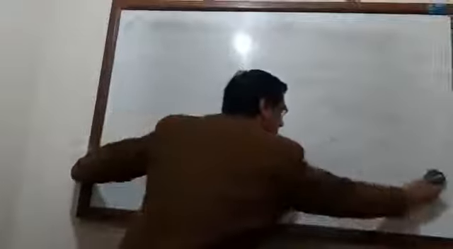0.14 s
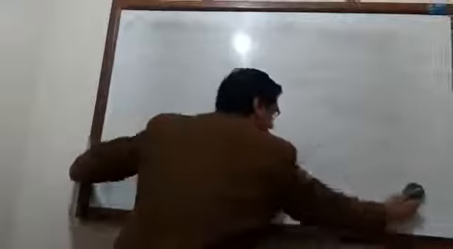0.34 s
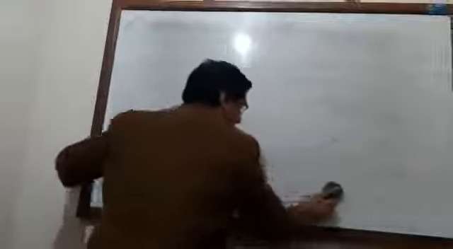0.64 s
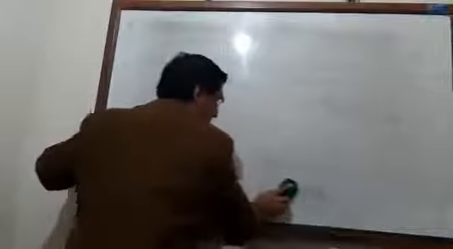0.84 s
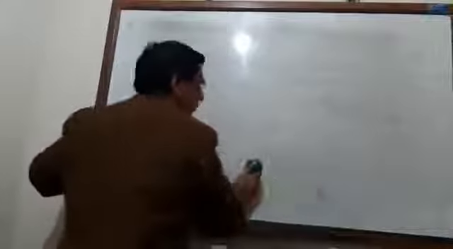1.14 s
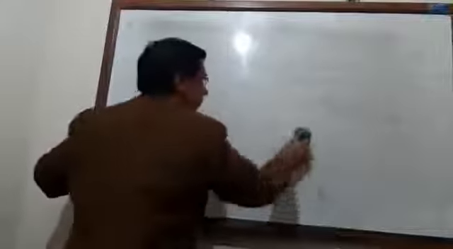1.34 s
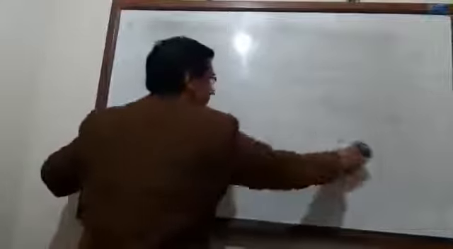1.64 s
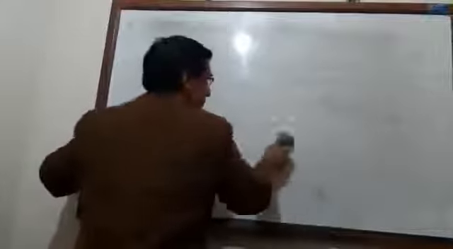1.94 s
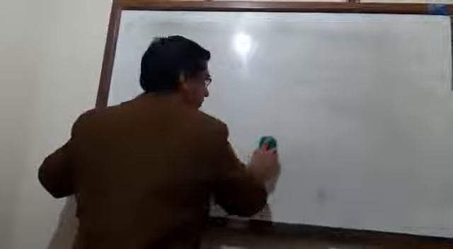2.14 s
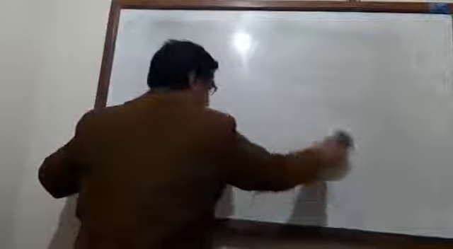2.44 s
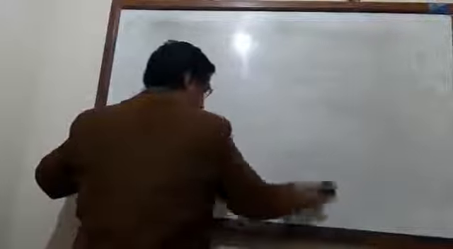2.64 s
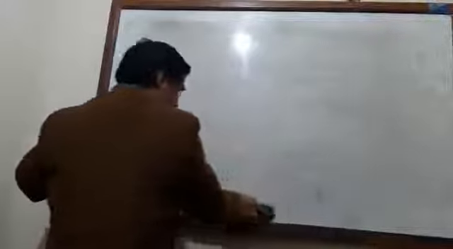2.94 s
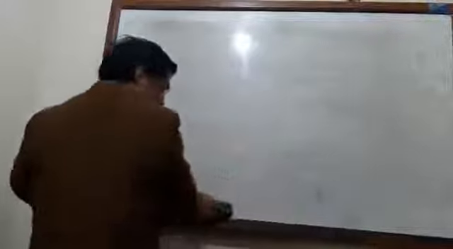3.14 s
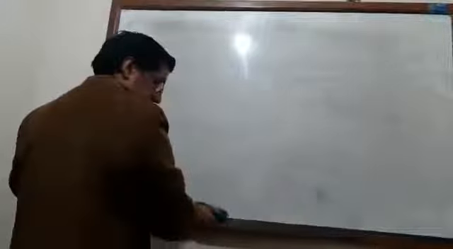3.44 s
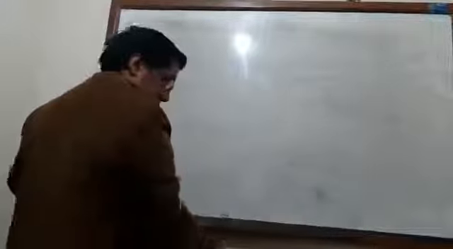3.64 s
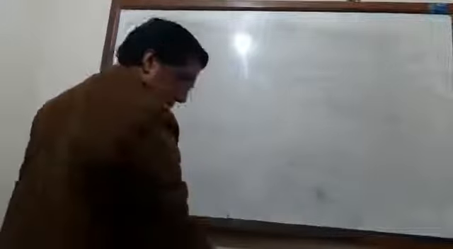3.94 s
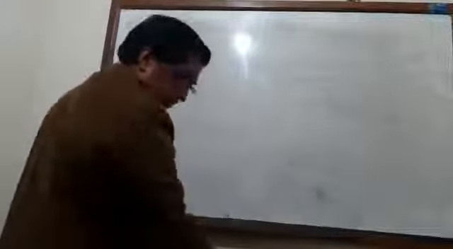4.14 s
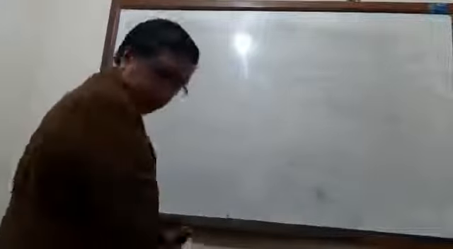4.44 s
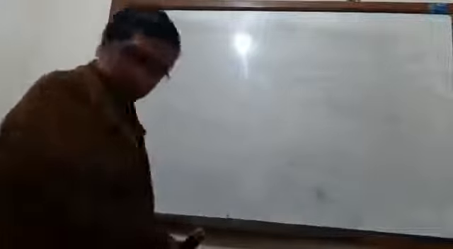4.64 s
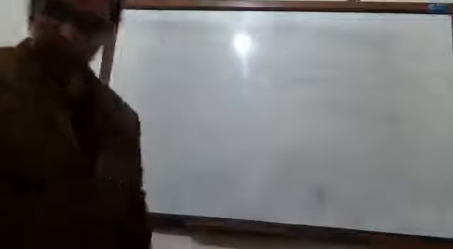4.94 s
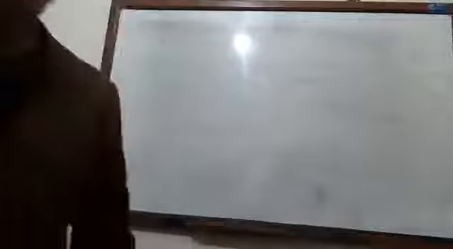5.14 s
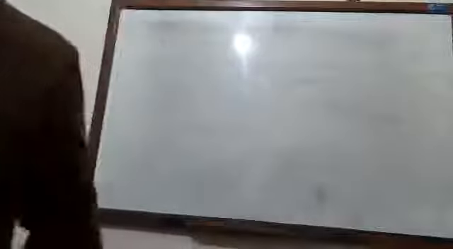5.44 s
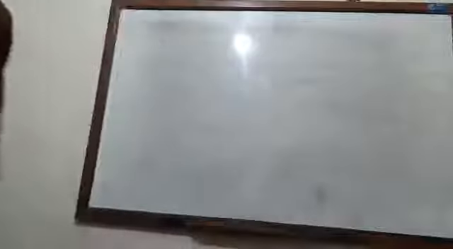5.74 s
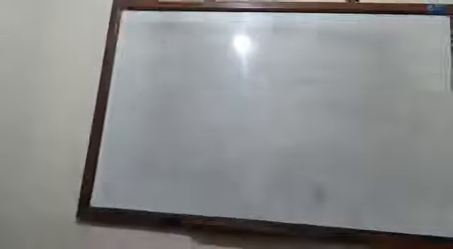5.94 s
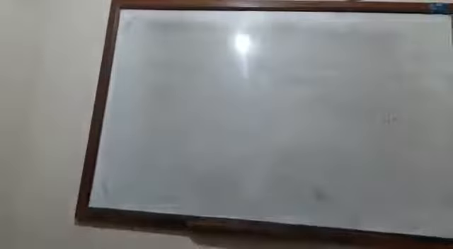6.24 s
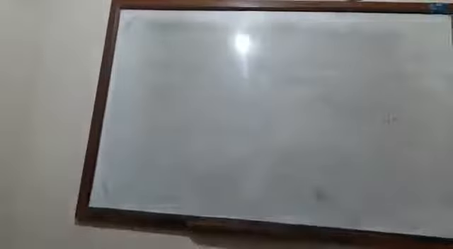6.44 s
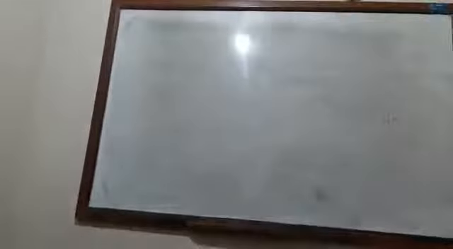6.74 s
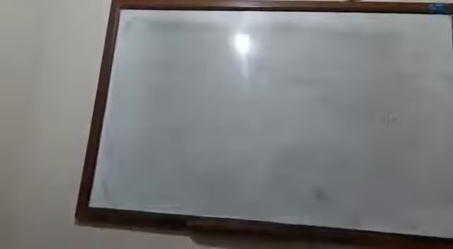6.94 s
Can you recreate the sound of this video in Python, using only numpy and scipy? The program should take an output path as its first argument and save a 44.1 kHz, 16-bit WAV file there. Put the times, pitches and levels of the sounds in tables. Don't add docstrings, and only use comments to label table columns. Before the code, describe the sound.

A dry felt eraser rubs a wall-mounted whiteboard in soft, hissing strokes, a few of them harder, with faint squeaks and panel drumming. It scrapes the ledge, then three plastic knocks ring through a small bare room, the last heaviest and boomy. Rubber soles and cloth shuffle off with little creaks and dull heel thumps. Captured by a phone a few metres away, over faint hiss and a low distant hum.

```python
import sys
import numpy as np
from scipy import signal
from scipy.fft import rfft, irfft
from scipy.io import wavfile
from scipy.ndimage import uniform_filter1d

SR = 44100
rng = np.random.default_rng(int(sys.argv[2]) if len(sys.argv) > 2 else 0)


def unload_audio(sound):
    columns = np.transpose(np.atleast_2d(sound))
    steps = np.round(np.clip(columns, -1, 1) * 32767)
    wavfile.write(sys.argv[1], SR, steps.astype(np.int16))


def gain_from_db(level_db):
    decades = np.asarray(level_db, float) / 20
    return 10 ** decades


N = 312430
T = np.arange(N) / SR
HZ = np.fft.rfftfreq(N, 1 / SR) + 1e-3


def read(table, hz):
    f, v = np.transpose(table)
    return np.interp(np.log(hz), np.log(f), v)


def unit(x):
    return x / np.sqrt(np.mean(x ** 2))


def shape(x, gain):
    return irfft(rfft(x) * gain, N)


def rings(table):
    return gain_from_db(sum(db / (1 + (2 * (HZ - f) / width) ** 2) for f, width, db in table))


def between(lo_hz, hi_hz):
    return 1 / np.sqrt((1 + (lo_hz / HZ) ** 8) * (1 + (HZ / hi_hz) ** 8))


def walk(rate):
    k = int(SR / rate)
    steps = np.repeat(rng.standard_normal(N // k + 1), k)
    return unit(uniform_filter1d(uniform_filter1d(steps, k), k)[:N])


def patchy(x, spread_db, hole_db, size, count):
    hz, _, z = signal.stft(x, SR, nperseg=1536)
    field = uniform_filter1d(rng.standard_normal(z.shape[1:]), size=size, axis=0)
    field = unit(uniform_filter1d(field, size=count, axis=1))
    edge = np.interp(hz, [1800, 2900, 7700, 8450, 9300, 10500], [-3, -1.9, -1.6, -1, -1.6, -2.3])[:, None]
    loud = np.mean(np.abs(z) ** 2, axis=(0, 1))
    quiet = loud < np.quantile(loud, .19)
    edge = edge + 1.6 * np.outer(np.exp(-((hz - 8300) / 450) ** 2), quiet)
    z = z * gain_from_db(spread_db * field - hole_db * (field < edge))
    return signal.istft(z, nperseg=1536)[1][:, :N]


# pitch_hz, level_db
PORT_DIFFERENCE = [(60, -10), (110, -9), (200, -9), (380, -7), (700, -3), (1290, 1), (2380, 0), (4400, 0),
                   (8120, 0), (15000, 0)]


def diffuse(grain_db, rate, clump_db=3.0):
    grains = rng.standard_normal((2, N)) * gain_from_db(grain_db * walk(rate))
    mid, side = patchy(grains, spread_db=clump_db, hole_db=0, size=2, count=6)
    side = shape(side, gain_from_db(read(PORT_DIFFERENCE, HZ)))
    return np.array([mid + side, mid - side])


def swells(s, held, rise, db, t60):
    t = T[::32, None]
    climb_db = 20 * np.clip(s - t, 0, None) / np.clip(rise, .002, None)
    decay_db = 60 * np.clip(t - s - held, 0, None) / t60
    power = gain_from_db(2 * (db - climb_db - decay_db))
    return np.interp(T, t[:, 0], power.sum(axis=1))


def touches(table, body_db, drum_db, t60s):
    s, held, rise, db, fizz_db = np.transpose(table)
    layers = zip((0, fizz_db, body_db, drum_db), t60s)
    return np.array([swells(s, held, rise, db + more, t60) for more, t60 in layers])


# start_s, hiss_db, lean_db (how much body and panel join in)
PRESSURE = [(0.0, -52, 1), (0.12, -55, 5), (0.28, -60.5, 0), (0.45, -57.5, -1), (0.65, -56.5, -1),
            (1.0, -54.5, -5), (1.3, -57, 7.5), (1.6, -57.5, -2), (2.15, -61, 0.5), (2.4, -57, 8),
            (2.6, -58.5, -5), (2.84, -62.5, 3), (2.88, -63.5, -11), (3.4, -65, -11), (3.48, -74, 6),
            (3.601, -100, 0.5)]
# full_at_s, held_s, rise_s (per 20 dB), hiss_db, fizz_db (against hiss)
SCRAPES = [(0.33, 0.11, 0.05, -64, 7), (0.78, 0.088, 0.1, -57, -16.5), (1.063, 0, .03, -54, 0),
           (1.08, 0.055, 0.08, -47.5, 0), (1.18, 0.011, 0.0644, -43.5, 0), (1.96, 0.14, 0.7, -58.5, -4.5),
           (2.156, .01, .015, -55, -12), (2.17, 0.023, 0.03, -47, -10.5), (2.73, 0.028, 0.26, -50, -2.5),
           (3.1, 0.092, -0.1, -62, -6), (3.39, 0.0, 2.5, -65, 2.5), (3.497, .004, 0, -60, -3),
           (3.504, 0.035, 0, -55, 0), (3.521, 0.03, .012, -49.5, 0.5), (3.536, .02, .02, -46, -2),
           (3.559, 0.016, 0.03, -42.5, -2.5), (3.96, .03, 0.1, -64.5, 0.5), (4.0, 0.0, 0.04, -60, 1),
           (4.009, 0.0077, -0.0146, -44, -11), (4.125, .01, -0.01, -52, -6),
           (4.038, 0.0027, -0.01, -47, -12), (4.138, 0.0, -0.07, -45, -16), (4.18, .04, .1, -56, 8),
           (4.11, 0.12, 0.13, -57, 5.5), (4.44, 0.0085, 0, -61, -7), (4.463, 0.022, 0.02, -47.5, 1.5)]
# full_at_s, held_s, rise_s (per 20 dB), hiss_db, fizz_db (against hiss)
SHUFFLES = [(4.74, 0.025, .1, -68.5, -2.5), (4.896, 0.12, 0.032, -60.5, -5.5),
            (5.036, 0.037, 0.02, -59, 0.5), (5.13, 0.019, 0.014, -63, 0), (5.174, 0.0, 0.1, -54.5, -3.5),
            (5.448, 0.11, 0.57, -70.5, -3.5), (5.535, 0.025, 0.028, -72, 3), (5.645, .02, .015, -70, 6),
            (5.694, 0.059, 0.046, -53, 0.5), (5.82, 0.046, .05, -62.5, -4), (5.902, 0.044, 0.012, -61, -2),
            (6.03, 0.022, 0.056, -72, -8), (6.18, .03, .02, -76, -5), (6.224, .01, .01, -70, 4),
            (6.25, 0.021, 0.036, -61, 6.5), (6.304, 0.069, 0.082, -53, -2),
            (6.426, 0.046, 0.068, -46.5, -4.5), (6.56, .04, .05, -68, -14), (6.64, 0.017, .015, -64, -9),
            (6.65, 0.071, 0.003, -54, -3.5), (6.74, .02, .03, -60, -1), (6.81, 0.0071, .03, -54.5, -0.5),
            (6.848, 0.0, 0.1, -46, -2.5), (7.064, .005, .004, -66, -4), (7.075, .02, .002, -53, -2.5)]
# full_at_s, held_s, drum_db, body_db (against drum)
FLEXES = [(0.12, 0.0, -67.5, -10), (0.31, 0.055, -62.5, -5), (0.76, 0.0027, -68, -18), (1.12, 0.1, -77, 18),
          (1.3, 0.13, -67, -10), (1.69, 0.03, -73, 4.5), (1.84, 0.0, -66.5, -8), (1.95, 0.091, -63, -5.5),
          (2.31, 0.0, -66, -9), (2.43, 0.13, -75.5, 6), (2.2, 0.042, -76, 12), (2.7, 0.07, -72.5, 6.5),
          (3.55, 0.049, -84, 13), (4.03, 0.13, -70.5, 8), (4.094, .04, -64.5, -6), (4.72, 0.0028, -69, -9),
          (5.05, 0.063, -78.5, 0), (5.742, 0.0, -75.5, 8.5), (5.95, 0.024, -75, -8), (6.304, 0.17, -65, -3),
          (6.384, 0.013, -57, -3), (6.486, 0.0, -66, 6), (6.655, 0.084, -64.5, 3.5),
          (6.848, 0.0, -62.5, 2.5)]
# hiss_t60_s, fizz_t60_s, body_t60_s, drum_t60_s
SCRAPE_T60_S = (0.38, 0.38, 0.28, 0.55)
SHUFFLE_T60_S = (0.38, 0.35, 0.42, 0.61)


def effort():
    s, db, lean_db = np.transpose(PRESSURE)
    against_hiss_db = 0, -6.5, -24 + lean_db, -24 + lean_db
    wipe_db = np.array([np.interp(T, s, db + more) for more in against_hiss_db])
    scrapes = touches(SCRAPES, body_db=-23.5, drum_db=-36, t60s=SCRAPE_T60_S)
    shuffles = touches(SHUFFLES, body_db=-20, drum_db=-25, t60s=SHUFFLE_T60_S)
    s, held, drum_db, body_db = np.transpose(FLEXES)
    rise_s, t60_s = 0.045, 0.31
    flex_body = swells(s, held, rise_s, drum_db + body_db, t60_s)
    flex_drum = swells(s, held, rise_s, drum_db, t60_s)
    flex = [0 * T, 0 * T, flex_body, flex_drum]
    return np.sqrt(gain_from_db(2 * wipe_db) + scrapes + shuffles + flex)


# pitch_hz, level_db (per Hz)
RUB_COLOUR = [(44, -32), (75, 9), (136, -16), (178, -9), (296, -7), (387, -8), (577, -9), (981, -11.5),
              (1400, -8), (2000, -6), (2280, -6), (2910, -7), (5000, -6), (7710, -6), (8430, -9.5),
              (9400, -10), (11800, -6.5), (15000, -11)]
# pitch_hz, width_hz, level_db
FELT_RINGS = [(390, 160, 4), (1500, 140, 1.2), (2050, 130, .8)]


def rubbing():
    colour = gain_from_db(read(RUB_COLOUR, HZ)) * rings(FELT_RINGS)
    hiss = unit(shape(diffuse(0.71, 300), colour * between(1130, 4650)))
    fizz = unit(shape(diffuse(0.6, 400), colour * between(4350, 23600)))
    body = unit(shape(diffuse(1.5, 100, clump_db=1.5), colour * between(680, 1040)))
    drum = unit(shape(diffuse(1.3, 60, clump_db=1.4), colour * between(224, 636)))
    return sum(gain * layer for gain, layer in zip(effort(), [hiss, fizz, body, drum]))


# start_s, peak_db, held_s (level tail), t60_s, gather_s (echoes build)
KNOCKS = [
    (4.009, -27, 0.05, 0.47, .022),
    (4.138, -19, 0.068, 0.4, .008),
    (4.466, -17.2, 0.042, 0.44, 0.0057),
]
# pitch_hz, level_db (per Hz)
KNOCK_COLOURS = [
    [(59, -53), (100, -51), (535, -26), (904, -16), (1560, -10), (2130, 1), (2800, -4), (5260, -13),
     (15000, -33.5)],
    [(59, -65), (100, -48.5), (425, -20), (646, -14), (1290, -13), (1530, -4), (2180, -6), (4260, -6.5),
     (5150, -10.5), (5720, -12), (15000, -27.5)],
    [(35, -46.5), (60, -13), (204, -5.5), (295, -13.5), (339, -8), (428, -13), (711, -8), (960, -10),
     (1300, -5), (1520, -3), (2200, -2), (2900, -4.5), (3660, -7), (5500, -13.5), (9230, -23.5),
     (13400, -17.5), (15000, -28)],
]
# pitch_hz, width_hz, level_db
KNOCK_RINGS = [(1160, 60, 3), (1550, 130, 1.2), (2140, 150, 2.5), (2480, 80, 2.5), (2950, 300, 2),
               (4150, 250, 1.5)]
# pitch_hz, share of t60_s
TAIL_STRETCH = [(100, 1.9), (400, 0.86), (2000, 0.96), (12000, 0.79)]


def knocks():
    out = 0
    octaves_hz = 50 * 2 ** np.arange(0, 9.)
    for (s, db, hold, t60, gather), colour in zip(KNOCKS, KNOCK_COLOURS):
        age = np.clip(T - s, 0, None)
        tone = gain_from_db(read(colour, HZ)) * rings(KNOCK_RINGS)
        echoes = unit(shape(diffuse(0.3, 500, clump_db=2.2), tone))
        fading_s = np.logaddexp(0, (age - hold) / .02) * 0.021
        gathering = 1 - 0.49 * np.exp(-(age / gather) ** 2)
        for lo in octaves_hz:
            rise = (1 - np.exp(-age * lo / 2.9)) * gathering
            band = shape(echoes, (HZ >= lo) & (HZ < 2 * lo))
            local = uniform_filter1d(band ** 2 + 1e-18, size=int(400 + 4e5 / lo), axis=1)
            band = band * (np.mean(band ** 2) / local) ** .4
            tail_db = db - 12 - 60 * fading_s / (t60 * read(TAIL_STRETCH, lo * 1.4))
            out = out + band * rise * gain_from_db(tail_db)
    return out


# (per octave away from 2300 Hz, up or down)
SNAPS = [
    (4.0121, -24, -27, -6),
    (4.1408, -22, -22, -5),
    (4.4674, -15, -12.5, 0),
    (4.4712, -26, -22, -4),
]
# start_s, left_db, right_db, slope_db
ECHOES = [(4.038, -33, -33, -8), (4.049, -35, -35, -8), (4.1445, -25, -25, -2), (4.479, -26, -26, -6),
          (4.486, -29, -29, -1), (4.4925, -26, -26, -5), (4.503, -28, -28, -6), (4.515, -28, -28, -7),
          (4.521, -29, -29, -6), (4.529, -29, -29, -7)]
# start_s, left_db, right_db, slope_db
TICKS = [(1.063, -45, -45, -8), (2.158, -50, -50, -6), (3.4965, -56, -56, 0), (3.561, -37, -37, -8),
         (3.674, -50, -50, -3), (7.0745, -53, -53, -1)]
# pitch_hz, level_db, t60_s
CRACK = [(2300, 0, .0022), (1600, -17, .012), (4000, -5, .0015), (8000, -4, .0012)]


def snaps():
    out = 0
    for s, left_db, right_db, slope_db in [*SNAPS, *ECHOES, *TICKS]:
        age = np.clip(T - s, 0, None)
        x = 0
        for f, db, t60 in CRACK:
            tilt_db = slope_db * abs(np.log2(f / CRACK[0][0]))
            turns = f * age + .15 * rng.random((2, 1)) + .5
            x = x + gain_from_db(db + tilt_db - 60 * age / t60) * np.sin(2 * np.pi * turns)
        onset = np.clip(age / .00035, 0, 1) ** 2
        x = shape(x * onset, between(1250, 14000))
        peaks = gain_from_db(np.array([[left_db], [right_db]]))
        out = out + peaks * x / np.abs(x).max(axis=1, keepdims=True)
    return out


# pitch_hz, level_db, t60_s
CASE_RINGS = [
    [(1335, -57, .4), (1523, -56, .33), (2140, -45, .4), (2229, -49, .5), (2519, -50, .3), (2869, -53, .45)],
    [(1520, -34, .3), (1925, -43, .5), (2018, -42, .55), (2141, -38, .42), (2326, -43, .4),
     (2444, -40, .42), (2557, -44, .4), (3052, -42, .4), (3429, -45, .4), (3665, -45, .4), (4420, -40, .35)],
    [(1150, -42, .4), (1471, -37, .35), (1577, -36, .35), (2140, -37, .33), (2475, -36, .25),
     (2799, -40, .33), (2970, -41, .35), (3327, -43, .4), (4124, -41, .27)],
]


def case():
    out = np.zeros((2, N))
    for (s, *_), modes in zip(KNOCKS, CASE_RINGS):
        on = slice(int(s * SR), int((s + .6) * SR))
        age = T[on] - T[on][0]
        rise = 1 - np.exp(-age / .004)
        for f, db, t60 in modes:
            flutter_db = 2 * np.array([walk(40)[on], walk(40)[on]])
            tone = np.sin(2 * np.pi * (f * age + rng.random((2, 1))))
            out[:, on] += rise * gain_from_db(db + flutter_db - 60 * age / t60) * tone
    return out


# pitch_hz, level_db, t60_s
BOOM = [(57.3, -53, .5), (70, -44, 0.54), (106.5, -36.5, 0.43), (118, -48.5, 0.26), (150, -55, 0.7),
        (175, -56, .4), (192.6, -34.5, 0.4), (221.7, -36.5, 0.45)]


def boom():
    age = np.clip(T - KNOCKS[-1][0], 0, None)
    swell = (1 - np.exp(-age / 0.044)) ** 2
    modes = 0
    for f, db, t60 in BOOM:
        modes = modes + gain_from_db(db - 60 * age / t60) * np.sin(2 * np.pi * (f * age + rng.random()))
    return swell * modes


# start_s, length_s, pitch_hz, width_hz, level_db
SQUEAKS = [(0.293, 0.07, 420, 250, -65), (0.72, 0.085, 1800, 950, -59), (1.946, 0.078, 430, 260, -63),
           (1.353, 0.09, 420, 280, -66), (2.267, 0.32, 432, 96, -72), (2.672, 0.039, 255, 37, -72),
           (3.527, 0.094, 2140, 900, -46.5), (3.06, .12, 1700, 450, -65), (5.132, 0.063, 1520, 300, -60),
           (5.15, .035, 1980, 400, -62), (5.035, .06, 2500, 900, -68), (4.2, .11, 2020, 140, -51),
           (6.41, .08, 2900, 900, -56), (7.066, .02, 4800, 1500, -64), (5.893, 0.055, 1990, 138.9, -61),
           (5.894, 0.064, 408, 100, -70.5), (6.645, 0.025, 730, 350, -58.5), (6.82, 0.041, 2600, 300, -58),
           (6.815, .05, 4200, 1000, -59), (3.545, .05, 2800, 500, -52)]


def squeaks():
    out = 0
    for s, length, f, width, db in SQUEAKS:
        on = np.clip(np.minimum((T - s) / (0.13 * length), (s + length - T) / 0.026 + 1), 0, 1)
        after_s = T - s - length
        tail = (after_s > 0) * gain_from_db(-7.5 - 60 * after_s.clip(0) / 0.49)
        ring = shape(diffuse(0, 9), 1 / (1 + (2 * (HZ - f) / width) ** 2))
        ring = ring / np.sqrt(uniform_filter1d(ring ** 2, size=1300, axis=1))
        out = out + gain_from_db(db) * np.maximum(on, tail) * ring
    return out


# start_s, length_s, pitch_hz, slip_rate_hz, level_db
CREAKS = [
    (5.034, 0.065, 1813, 125, -53.5),
    (6.735, .027, 2090, 150, -54),
    (6.808, .037, 1940, 120, -53.5),
]


def creaks():
    out = 0
    for s, length, f, rate, db in CREAKS:
        on = np.clip(np.minimum((T - s) / .004, (s + length - T) / 0.0088 + 1), 0, 1)
        slip_turns = np.array([np.cumsum(rate * (1 + .25 * walk(90))) / SR for _ in range(2)])
        turns = np.array([np.cumsum(f * (1 + .03 * walk(250))) / SR for _ in range(2)])
        slips = 1 + .7 * np.cos(2 * np.pi * slip_turns)
        out = out + gain_from_db(db) * on * slips * np.sin(2 * np.pi * turns)
    return out


# start_s, pitch_hz, level_db
WHINE = [(6.505, 785, -75), (6.516, 785, -62), (6.537, 780, -68), (6.55, 780, -64), (6.572, 778, -62),
         (6.6, 768, -66), (6.64, 768, -68), (6.651, 780, -54), (6.67, 740, -75)]


def whine():
    s, hz, db = np.transpose(WHINE)
    flutter_db = 3.5 * np.array([walk(90), walk(90)])
    level_db = np.interp(T, s, db, left=-200, right=-200) + flutter_db
    pan_db = -5 * np.array([[.5], [-.5]])
    pitch_hz = np.interp(T, s, hz) + 24 * walk(200)
    return gain_from_db(level_db + pan_db) * np.sin(2 * np.pi * np.cumsum(pitch_hz) / SR)


# start_s, pitch_hz, level_db
HEELS = [(6.41, 100, -57), (6.49, 95, -60), (6.674, 100, -53), (6.78, 90, -53), (6.815, 106, -56),
         (6.64, 90, -60)]


def heels():
    out = 0
    for s, f, db in HEELS:
        age = np.clip(T - s, 0, None)
        rise = 1 - np.exp(-age / 0.0043)
        out = out + rise * gain_from_db(db - 60 * age / 0.15) * np.sin(2 * np.pi * f * age)
    return out


# full_at_s, held_s, level_db
THUDS = [(0.1, 0.065, -74), (0.32, 0.052, -70), (0.74, 0.096, -79), (1.05, 0.0, -71.5), (1.18, 0.0, -73),
         (1.41, 0.023, -71), (1.71, 0.0, -70), (2.33, 0.056, -78), (2.76, 0.07, -81), (3.18, .2, -82.5),
         (3.61, 0.0078, -70), (4.0, 0.41, -77), (4.75, 0.03, -69.5), (5.02, 0.026, -77),
         (5.31, 0.038, -74.5), (5.51, .56, -76), (6.18, 0.18, -67), (6.3, .05, -73), (6.44, 0.11, -67),
         (6.67, 0.0, -73), (6.86, 0.0, -70), (6.95, 0.073, -76)]


def thuds():
    s, held, db = np.transpose(THUDS)
    rumble_db = -82.5
    gain = np.sqrt(swells(s, held, 0.09, db, .36) + gain_from_db(2 * rumble_db))
    return gain * unit(shape(diffuse(0.53, 30, clump_db=1.5), between(47, 232)))


# start_s, first_db (fundamental), third_db (third partial against it)
HUM = [(0.0, -86, -14), (0.18, -73, -17), (0.73, -91, 14), (1.01, -71, -14), (1.65, -83.5, 9),
       (2.03, -93, 13), (2.8, -85.5, 4.5), (3.6, -83.5, 1), (4.18, -76, -2), (4.25, -66, -16),
       (4.4, -82, -6), (4.9, -76, -14), (5.46, -68.5, -19.5), (6.09, -65.5, -9.5), (6.19, -85, 22),
       (6.5, -83, -5), (6.8, -72, -10), (7.08, -88, 5)]
# start_s, level_db
SECOND = [(0, -82), (.9, -76), (1.3, -84), (2.2, -84), (2.85, -90), (3.5, -88), (4.2, -78), (4.9, -79),
          (5.25, -77), (5.6, -83), (6.2, -79), (7.08, -81)]


def hum():
    s, first_db, third_db = np.transpose(HUM)
    turns = np.cumsum(56.6 + 0.602 * walk(4.0)) / SR
    first = np.interp(T, s, first_db)
    second = np.interp(T, *np.transpose(SECOND)) + 2.0 * walk(9)
    third = np.interp(T, s, first_db + third_db)
    out = 0
    for k, db in enumerate([first, second, third], start=1):
        out = out + gain_from_db(db + 1.0 * walk(7.1)) * np.sin(2 * np.pi * k * turns)
    return out


# pitch_hz, level_db (per Hz)
HISS = [(18, -27), (30, -12), (171, -20), (394, -15.5), (1140, -21), (2030, -22.5), (4780, -14.5),
        (7400, -25.5), (8400, -32), (9500, -26), (11600, -20), (15000, -23)]
# full_at_s, held_s, dip_db (strength; 0 turns the hiss down 3 dB)
DIPS = [
    (3.8, .11, 0.84),
    (4.83, 0.029, 0.79),
    (6.12, .03, 3),
]


def room_hiss():
    floor = gain_from_db(-69) * unit(shape(diffuse(0.31, 30), gain_from_db(read(HISS, HZ))))
    s, held, db = np.transpose(DIPS)
    return floor / np.sqrt(1 + swells(s, held, .1, db, 0.23))


def scene():
    noisy = patchy(rubbing() + knocks() + room_hiss(), spread_db=0, hole_db=25, size=5, count=11)
    struck = snaps() + case() + boom()
    steps = squeaks() + creaks() + whine() + heels()
    return noisy + struck + steps + thuds() + hum()


def top_cut(x):
    return signal.sosfilt(signal.butter(12, 15980, fs=SR, output="sos"), x)


# pitch_hz, level_db (left minus right)
PORTS = [(60, 3), (110, -1), (200, 2.5), (380, 0.5), (700, 0), (1290, 0.5), (2380, -0.5), (4400, 2),
         (8120, -0.5), (15000, -5.5)]


def record(dry):
    half_db = read(PORTS, HZ) / 2
    mix = shape(dry, gain_from_db(np.array([half_db, -half_db])) * (HZ < 15040))
    return top_cut(mix)


dry = scene()
out = record(dry)
unload_audio(out)
```